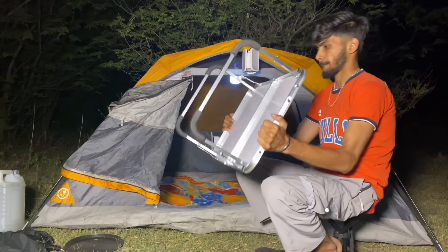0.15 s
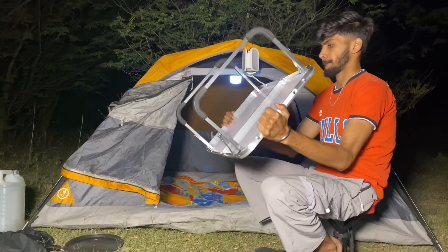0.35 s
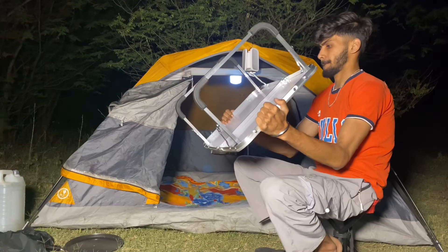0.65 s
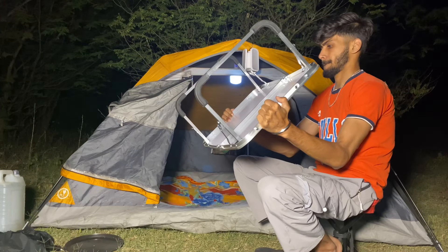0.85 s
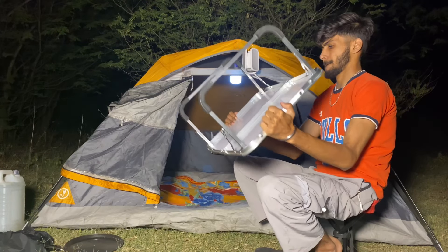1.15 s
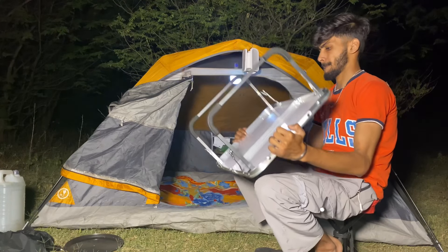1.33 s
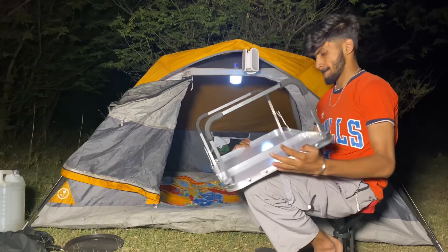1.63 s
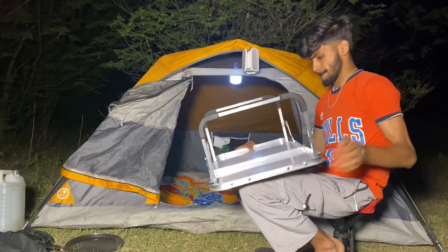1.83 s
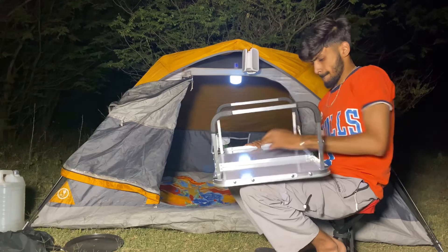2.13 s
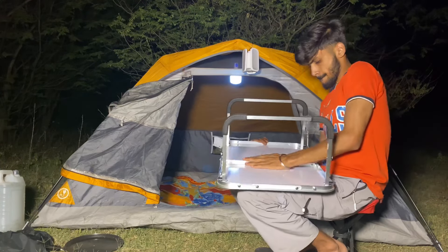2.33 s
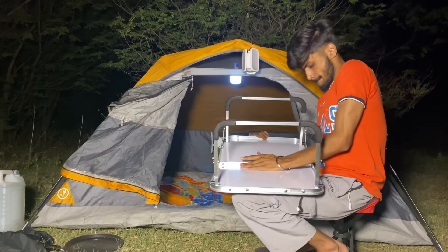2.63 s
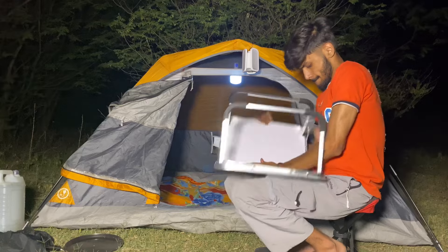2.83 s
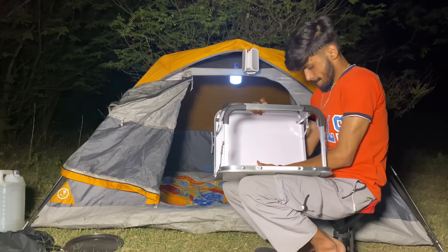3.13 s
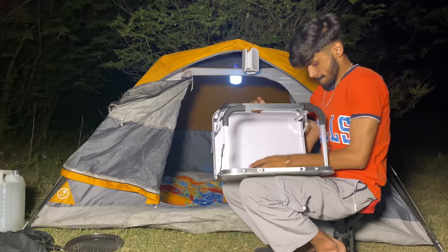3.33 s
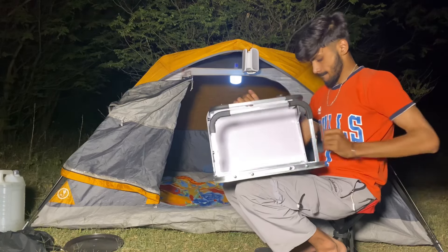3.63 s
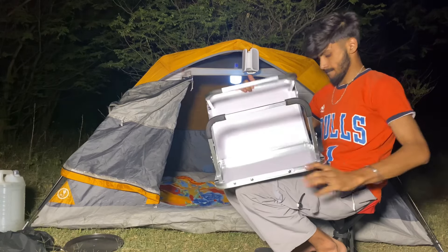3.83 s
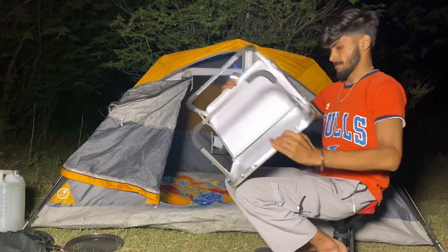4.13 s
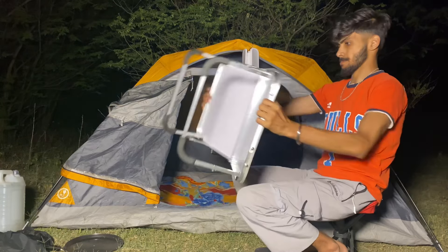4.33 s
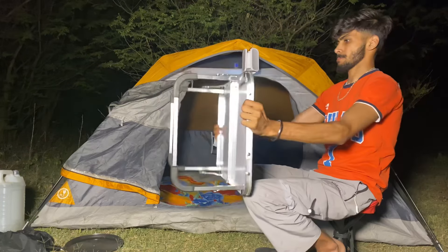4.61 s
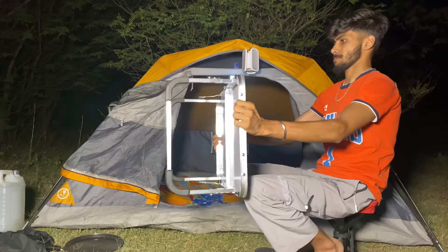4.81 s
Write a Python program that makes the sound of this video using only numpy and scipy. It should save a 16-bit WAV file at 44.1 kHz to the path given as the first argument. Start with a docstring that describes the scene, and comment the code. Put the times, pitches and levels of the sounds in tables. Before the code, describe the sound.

Over soft night insects, a palm slaps a thin metal table, rubs across it, and a leg frame clacks into place.

```python
"""Outdoors at night, a folding aluminium camp table is opened on someone's lap.
A palm smacks the top flat and bounces, so the thin metal booms and rings. The hand rubs and
bumps it, then a leg frame swings out and locks with a clatter of metal on metal.
All round, crickets and other insects trill by scraping their wings, over a low distant rumble."""
import sys
import numpy as np
from scipy import signal
from scipy.fft import rfft, irfft, next_fast_len
from scipy.io import wavfile

SR = 44100
rng = np.random.default_rng(int(sys.argv[2]) if len(sys.argv) > 2 else 0)


def digitize_waveform(pressure):
    """Quantize a signal to 16-bit integers and store it at the path in sys.argv[1].

    Rows of a 2-D input are taken as channels; values are limited to [-1, 1].
    """
    field = np.atleast_2d(pressure).T
    bounded = np.clip(field, -1, 1)
    quanta = np.round(bounded * 32767).astype(np.int16)
    wavfile.write(sys.argv[1], SR, quanta)


N = 219085
TIME = np.arange(N) / SR
RING_TIME = np.arange(SR // 2) / SR  # half a second, room for one short sound
METAL_TILT_DB = 6.5  # per octave: metal on metal favours the table's high tones

# the tones at which the aluminium top and tubes ring: (pitch [Hz], level [dB], time to fade 60 dB [s])
TABLE_TONES = [(270.5, -6, .2), (380, 0, 0.26), (469, -1.5, 0.23077), (507.55, -2.5, 0.17),
               (588.5, -2.5, 0.11), (792, -1, 0.13), (901, -6.5, 0.1), (1136, -6.5, 0.17),
               (1260, -15, 0.32), (1328, -0.5, .13), (1664, -6, .1), (1907, -2.5, .08), (2082.3, -4.5, 0.1),
               (2250, -1.5, 0.076), (2950, -3.5, 0.16), (3092, -12.5, 0.064), (3900, -3.5, 0.06),
               (3770, -4.5, 0.081), (4470, -2.5, 0.11), (5390, -13.5, 0.078), (6400, -15.5, 0.077),
               (7770, -40.5, 0.13), (9600, -16, .1), (14050, -14.5, .13)]
# the table is close, so both ears hear it alike up to the treble: (frequency [Hz], likeness [0 to 1])
NEAR_LIKENESS = [(300, 0.71), (1300, 0.74), (3000, 0.82), (6000, 0.86), (15000, 0.32)]


def amp(db):
    """Turns decibels into a number to multiply a sound by."""
    return 10 ** (np.asarray(db) / 20)


def evened(x):
    """Scales a sound to an average (rms) level of 1."""
    return x / np.sqrt(np.mean(x ** 2) + 1e-20)


def read_curve(points, hz):
    """Reads between a table's points, with frequency spaced in octaves."""
    point_hz, value = np.transpose(points)
    return np.interp(np.log(hz + 1), np.log(point_hz + 1), value)


def colour_gain(colour, hz, tilt_db):
    """How strong each frequency is, with the treble above 500 Hz tilted by tilt_db per octave."""
    return amp(read_curve(colour, hz) + tilt_db * np.log2(np.maximum(hz, 500) / 500))


def pan(db):
    """Makes the left ear louder than the right by db."""
    return amp(np.array([[db], [-db]]) / 2)


def add(mix, start, sound):
    """Adds a sound to the mix at a start time in seconds."""
    part = mix[:, round(start * SR):][:, :sound.shape[-1]]
    part += sound[..., :part.shape[1]]


def ramp(start, end, attack_s, release_s):
    """Fades in, holds and fades out between two times."""
    return np.clip((TIME - start) / attack_s, 0, 1) * np.clip((end - TIME) / release_s, 0, 1)


def drift(per_s):
    """A random wander, about 1 in size, that turns per_s times a second."""
    turns = np.arange(0, TIME[-1] + 1, 1 / per_s)
    return np.interp(TIME, turns, rng.standard_normal(len(turns)))


def noise(colour, likeness, size, tilt_db=0):
    """Stereo noise with a given tone colour and likeness between the ears."""
    hz = np.fft.rfftfreq(size, 1 / SR)
    left, other = rfft(rng.standard_normal((2, size)))
    same = np.clip(read_curve(likeness, hz), -1, 1)
    right = same * left + np.sqrt(1 - same ** 2) * other
    return evened(irfft(np.array([left, right]) * colour_gain(colour, hz, tilt_db), size))


def echoes(x, t60, wet_db):
    """Adds reflections from tent, ground and bushes, which fade by 60 dB in t60 seconds."""
    shape = (2, len(RING_TIME))
    bounces = rng.standard_normal(shape) * (rng.random(shape) < 2000 / SR)  # about 2000 a second
    bounces *= amp(-60 * RING_TIME / t60) * (RING_TIME > .003)
    bounces /= np.linalg.norm(bounces, axis=1, keepdims=True)
    return x + amp(wet_db) * signal.oaconvolve(np.atleast_2d(x), bounces, axes=1)[:, :N]


def night_air():
    """Still air and a far rumble: steady noise, strongest in the bass."""
    # the tone colour of the air: (frequency [Hz], level [dB])
    colour = [(20, -33.5), (40, -5.5), (65, 2.5), (120, -5), (200, -12), (330, -21.5), (650, -36),
              (1300, -35), (2100, -40), (3700, -52), (5200, -45), (6200, -37.5), (9000, -34.5),
              (11000, -44), (13500, -38.5), (16000, -47)]
    # how alike the two ears hear it: (frequency [Hz], likeness [0 to 1])
    likeness = [(60, 0.96), (200, 0.8), (500, 0.13), (1200, 0.06), (3000, 0.15), (15000, 0.088)]
    return amp(-47) * noise(colour, likeness, N)


def trill(hz, per_s, fall_hz, duty, rasp, waver=.03):
    """Short falling tones. In an insect each is one wing stroke, and uneven teeth make it rasp."""
    pace = per_s * (1 + waver * drift(12))
    cycle = (rng.random() + np.cumsum(pace) / SR) % 1
    stroke = np.minimum(cycle / duty, 1)  # duty is the share of each cycle that sounds
    pitch = hz * (1 + rasp * drift(500)) + fall_hz * (.5 - stroke)
    return evened(np.sin(np.pi * stroke) * np.sin(2 * np.pi * np.cumsum(pitch) / SR))


def far_chorus(count=8):
    """Far insects and a faint, very high, flickering hiss, each a blend of trills left and right."""
    # four groups of insects, then the hiss in the last row: (pitch [Hz], spread either way [Hz],
    # pulses [per s], pitch fall in a pulse [Hz], relative level [dB])
    groups = [(2921, 75, 47, 240, -41), (2675.4, 60, 40, 160, -55.5), (3292.8, 43, 59, 140, -72),
              (7687.1, 220, 54, 860, -60.5), (13700, 600, 65, 900, -70.5)]
    out = np.zeros((2, N))
    for hz, spread_hz, per_s, fall_hz, db in groups:
        for k, offset in enumerate(np.linspace(-1, 1, count)):
            pace = per_s * rng.uniform(.8, 1.25)
            voice = trill(hz + spread_hz * offset, pace, fall_hz, duty=.6, rasp=.01288)
            level = amp(db + 1.7 * drift(25)) / np.sqrt(count)
            out += level * pan(5 * (-1) ** k) * voice
    return echoes(out, t60=.2, wet_db=3.5) * pan(-.5) * amp(-7)


def near_crickets():
    """Three wing scrapers on the left: one steady, one in spells, and a buzzing bush cricket."""
    # spells of cricket song: (start [s], end [s], relative level [dB])
    spells = [(-.1, .08, -55), (.1, 0.81, -71), (0.308, 0.49, -58), (0.748, .95, -55.5), (1.02, 2.9, -60)]
    # the bush cricket's swelling buzzes: (start [s], end [s], relative level [dB])
    buzzes = [(-.25, 0.421, -59), (1.093, 1.798, -60), (2.707, 3.32, -58), (4.114, 4.76, -58)]
    steady = amp(-64.5) * trill(4370, 44, fall_hz=469.88, duty=.71, rasp=.019)
    song = sum(amp(db) * ramp(start, end, .065, .065) for start, end, db in spells)
    song *= amp(2 * drift(60))  # the level flickers
    singer = song * trill(5262.3, 62, fall_hz=510.7, duty=.6, rasp=.0099)
    swell = sum(amp(db) * ramp(start, end, .35, .02052) for start, end, db in buzzes)
    buzz = swell * trill(6640, 131, fall_hz=445.84, duty=.73, rasp=.0087, waver=.011)
    crickets = echoes(steady, t60=.25, wet_db=3) + amp(-4.5) * echoes(singer + buzz, t60=.088, wet_db=0)
    return crickets * pan(2.8)


def high_chirps(half_length_s=.04):
    """Short, thin, very high chirps, each a brief swell of a trill."""
    # runs of evenly spaced chirps: (first chirp [s], spacing [s], chirps [count])
    runs = [(.02, .334, 9), (3.21, 0.31665, 6)]
    beats = [first + k * spacing for first, spacing, count in runs for k in range(round(count))]
    pulses = sum(np.exp(-((TIME - beat) / half_length_s) ** 2) for beat in beats)
    chirps = pulses * trill(9880, 150, fall_hz=450, duty=.88, rasp=.016)
    return amp(-68) * echoes(chirps, t60=.1, wet_db=-.5)


def ring(tilt_db=0):
    """The table's own tones die away; the higher ones reach the two ears out of step."""
    hz, db, t60 = np.transpose(TABLE_TONES)[:, :, None]
    db = db + tilt_db * np.log2(np.minimum(hz, 2000) / 1000)
    lag = np.minimum(hz / 4000, 1) ** 2 * rng.uniform(-np.pi, np.pi, (2, len(hz), 1))
    sign = (-1) ** np.arange(len(hz))[:, None]  # neighbouring tones swing in opposite directions
    return (sign * amp(db - 60 * RING_TIME / t60) * np.sin(2 * np.pi * hz * RING_TIME + lag)).sum(1)


def rubbing(grain_db=3, hollow_db=-10):
    """Skin and cloth catch and slip on the table, and its tones colour their hiss."""
    # the hiss of skin and cloth on the top: (frequency [Hz], level [dB])
    colour = [(100, -6.5), (300, -3), (520, -10.5), (700, -11.5), (1100, -11), (1600, -10), (4500, -9.5),
              (7000, -15), (10500, -12), (12200, -35), (14000, -25), (16000, -35)]
    # strokes over the table: (start [s], length [s], relative level [dB], treble tilt [dB per octave])
    strokes = [(0, 0.064, -51, 4), (1.12, 0.1115, -57, -4.5), (1.488, 0.19, -52, -1),
               (2.518, 0.38, -55.5, 2.5), (2.784, 0.15, -41, -2.5), (2.918, 0.15, -44.5, 0.5),
               (3.248, .11, -53.5, 0), (3.911, 0.089, -52.5, 0.5), (3.952, 0.41, -60.5, 0.5),
               (4.311, 0.35, -48, -1)]
    hiss = np.zeros((2, N))
    for start, length, db, tilt_db in strokes:
        speed = np.sin(np.pi * np.clip(RING_TIME / length, 0, 1))
        add(hiss, start, amp(db) * speed ** .72 * noise(colour, NEAR_LIKENESS, len(RING_TIME), tilt_db))
    hiss *= amp(grain_db * drift(250))
    body = ring()
    hollow = amp(hollow_db) * signal.oaconvolve(hiss, body / np.linalg.norm(body), axes=1)[:, :N]
    return amp(-3) * (hiss + hollow)


def scrapes():
    """Sliding makes a narrow band of noise whose pitch shifts as the point of contact moves."""
    # the palm drags, the top slides on the lap, and the frame swings round in its hinges:
    # (start [s], peak [s], end [s], level [dB], first pitch [Hz], last pitch [Hz], band width [Hz])
    slides = [(2.8, 2.873, 2.98, -40.5, 578, 473.5, 116.5), (2.888, 3.027, 3.09, -50.5, 1100, 1132, 350.7),
              (3.101, 3.468, 4, -61, 399.3, 320.6, 297), (3.398, 3.45, 3.62, -63, 1020, 1150, 450),
              (3.5, 4.34, 4.46, -58, 1255, 1480, 420)]
    out = np.zeros((2, N))
    for start, peak, end, db, first_hz, last_hz, width_hz in slides:
        colour = [(0, 0), (width_hz / 2, 0), (width_hz * 2, -25), (width_hz * 10, -90)]
        low_noise = noise(colour, NEAR_LIKENESS, next_fast_len(N))[:, :N]
        hz = np.interp(TIME, [start, end], [first_hz, last_hz])
        groan = evened(low_noise * np.cos(2 * np.pi * np.cumsum(hz) / SR))  # lifts it to that pitch
        out += amp(db) * ramp(start, end, peak - start, end - peak) * groan
    return out


def thumps(rise_s=.0021):
    """The whole table bumps against knees and hands, giving soft, low tones."""
    # the bumps: (time [s], level [dB], pitch [Hz], time to fade 60 dB [s])
    bumps = [(1.55, -30.5, 319, 0.06), (2.277, -28, 145, 0.16), (2.277, -24.5, 208, 0.11),
             (2.863, -30, 158, 0.1203), (2.874, -24.5, 98.7, 0.15), (4.428, -23.5, 70.6, 0.2),
             (4.43, -24.5, 309, 0.16), (4.433, -29.5, 127.2, 0.16)]
    out = np.zeros((2, N))
    for start, db, hz, t60 in bumps:
        level = amp(db - 60 * RING_TIME / t60) * (1 - np.exp(-RING_TIME / rise_s))
        add(out, start, level * np.sin(2 * np.pi * hz * RING_TIME))
    return out * pan(-1.5)


def clack(db, tilt_db, t60, ring_db):
    """Metal hits metal: a quickly dying burst of noise that leaves the table ringing."""
    # the tone colour of the burst: (frequency [Hz], level [dB])
    colour = [(25, -49.5), (80, -20.5), (300, -5), (520, -6.5), (800, -3.5), (1200, 0), (1600, -1),
              (2300, -2.5), (3700, -2), (4400, -3), (5300, -5.5), (6300, -10), (8000, -12), (10200, -10),
              (12200, -31.5), (14000, -24.5), (16000, -34.5)]
    burst = noise(colour, NEAR_LIKENESS, len(RING_TIME), tilt_db) * amp(db - 60 * RING_TIME / t60)
    return burst + amp(db + ring_db) * ring(METAL_TILT_DB)


def rattles(rise_s=.0019):
    """The loose leg frame ticks in its hinges, too lightly to make the top boom."""
    # the ticks: (time [s], level [dB], treble tilt [dB per octave])
    ticks = [(.28, -46.5, 8), (1.792, -51, -1), (2.832, -36.5, 21), (4.342, -41, 2), (4.401, -33, -1),
             (4.496, -35.5, -4.5), (4.575, -36.5, -1), (4.603, -41.5, 4), (4.621, -37, 1), (4.74, -48, 3)]
    out = np.zeros((2, N))
    for start, db, tilt_db in ticks:
        tick = clack(db, tilt_db, t60=.056, ring_db=-24)
        add(out, start, tick * (1 - np.exp(-RING_TIME / rise_s)))
    return out * pan(2)


def boom(tilt_db, travel_s=.00528):
    """A blow bends the thin top. Treble crosses it faster than bass, so the pitch quickly falls."""
    # the tone colour of the wave in the top: (frequency [Hz], level [dB])
    colour = [(40, -45.5), (120, -21), (300, -16.5), (380, 0.5), (470, 1), (600, -0.5), (680, -21.5),
              (930, -21), (1120, -4), (1500, -21.5), (4000, -32), (8000, -64.5)]
    hz = np.fft.rfftfreq(len(RING_TIME), 1 / SR)
    delay = travel_s * np.sqrt(450 / np.maximum(hz, 100))  # travel_s is the crossing time at 450 Hz
    phase = 2 * np.pi * np.cumsum(delay - np.interp(5000, hz, delay)) * hz[1]
    spectrum = colour_gain(colour, hz, tilt_db) * np.exp(-1j * phase)
    wave = irfft(spectrum, len(RING_TIME)) * (RING_TIME < .1)
    return wave / abs(wave).max()


def knocks():
    """Each blow clacks the metal and booms the top; a softer one has a longer, duller contact."""
    # the table settles on the lap, the palm smacks and bounces, the hand shifts, the legs lock:
    # (time [s], clack [dB], boom [dB], clack's treble tilt [dB per octave], boom left over right [dB])
    blows = [(1.546, -42, -51, -9.5, -12), (2.276, -7, -4, -1.4787, -6.5), (2.29, -22.5, -28.5, -10, 6),
             (2.322, -38.5, -27, -7.5, -1), (2.3721, -23, -13.5, -5, -7), (2.797, -58, -37.5, 6, -6),
             (2.865, -34.5, -29, -6, -8.5), (2.879, -37, -30.5, -13.5, -10), (3.271, -60.5, -34, -7, -6.5),
             (4.4203, -18, -51, -4, 4), (4.4224, -13.5, -31, 8, -3.5), (4.429, -18, -28.5, -8.5, -7),
             (4.437, -23.5, -36, 3, 15.5), (4.455, -20.5, -46, -2.5, -8)]
    out = np.zeros((2, N))
    for start, clack_db, boom_db, tilt_db, side_db in blows:
        softness_db = -max(clack_db, boom_db)
        rise_s = .00004 * 2 ** (softness_db / 6)  # doubles for every 6 dB softer
        fade_s = .03 * 2 ** (softness_db / 22)
        metal = clack(clack_db, tilt_db, fade_s, ring_db=-29)
        top = amp(boom_db) * (boom(tilt_db=-.18 * softness_db) + amp(-31) * ring())
        blow = pan(1.5) * metal + pan(side_db) * top
        add(out, start, blow * (1 - np.exp(-RING_TIME / rise_s)))
    return out


def scene():
    """The table close by, with insects and night air around it."""
    handling = knocks() + rattles() + thumps() + rubbing() + scrapes()
    left, right = echoes(handling, t60=.4, wet_db=-19)
    table = np.array([left, np.roll(right, 1)])  # it reaches the left ear a shade earlier
    return table + far_chorus() + near_crickets() + high_chirps() + night_air()


def record(dry):
    """Clips any peak beyond full scale, then cuts the treble above 15800 Hz."""
    treble_cut = signal.firwin(511, 15800, window=("kaiser", 9), fs=SR)
    return signal.oaconvolve(np.clip(dry, -1, 1), treble_cut[None], "same")


dry = scene()
out = record(dry)
digitize_waveform(out)
```